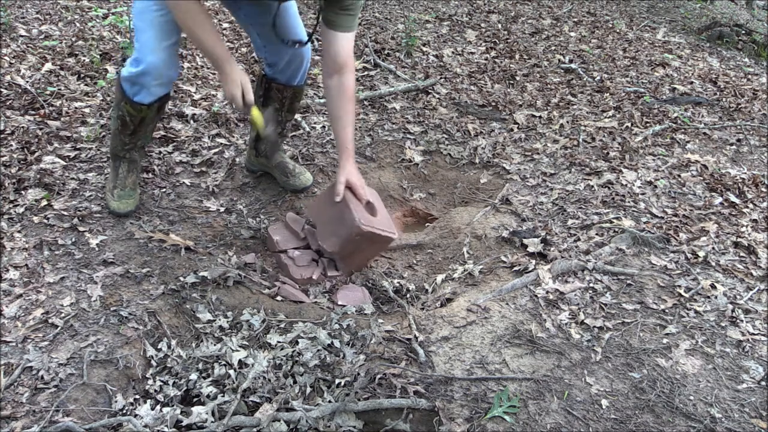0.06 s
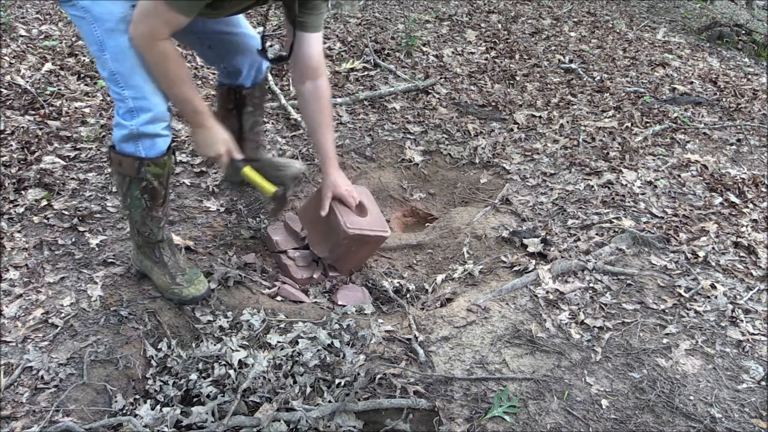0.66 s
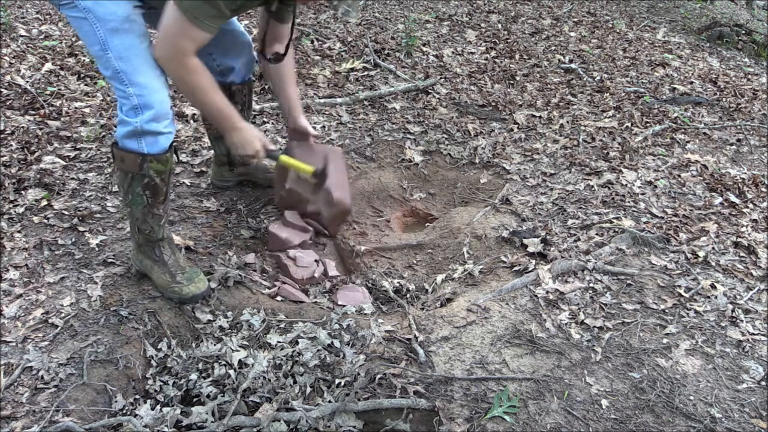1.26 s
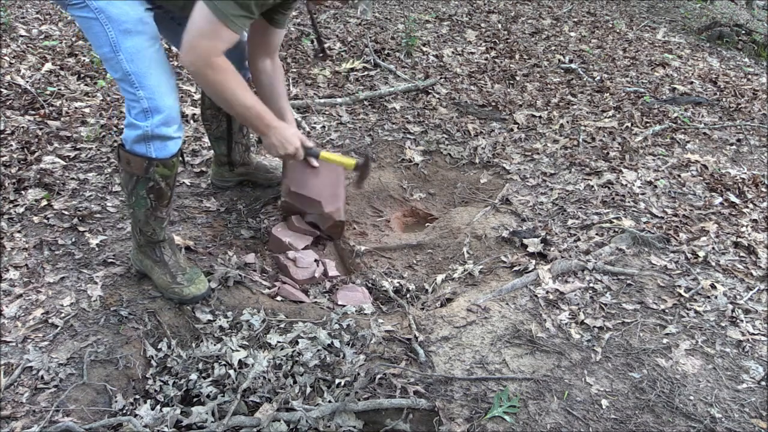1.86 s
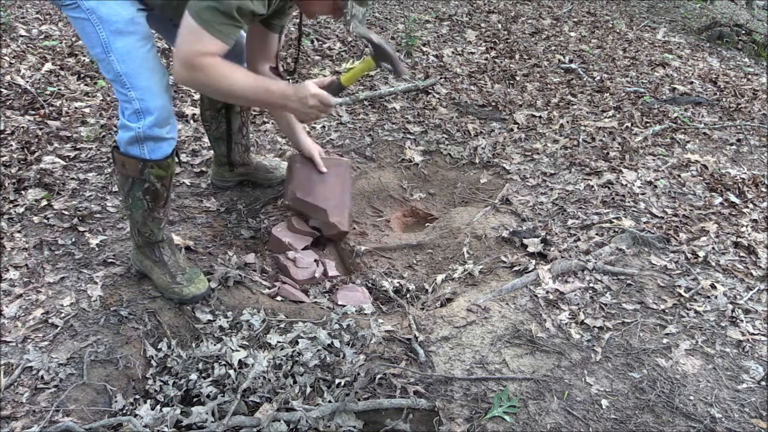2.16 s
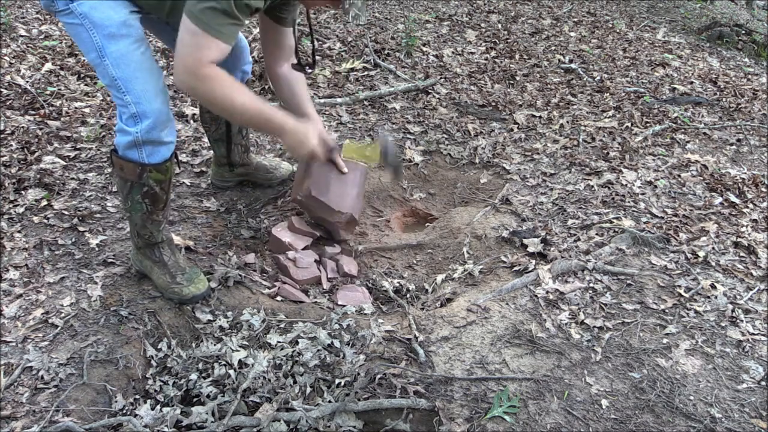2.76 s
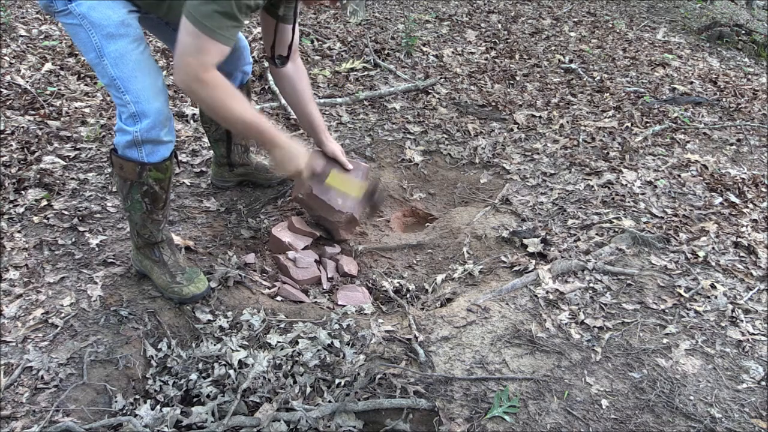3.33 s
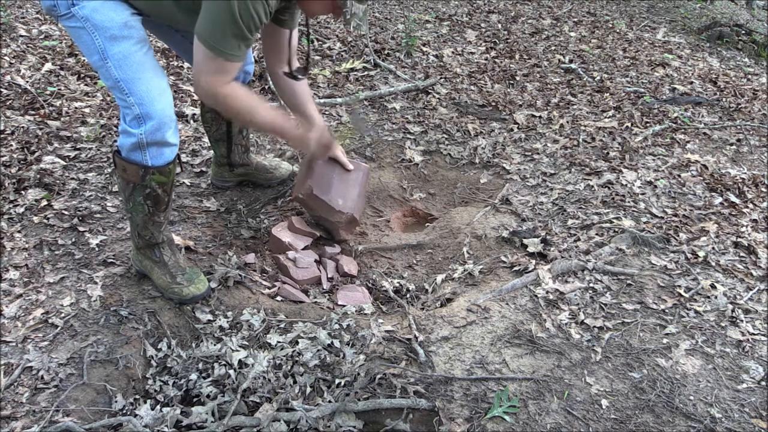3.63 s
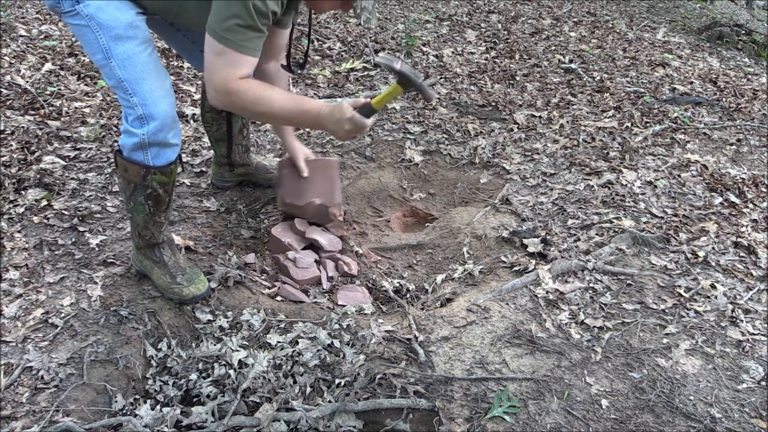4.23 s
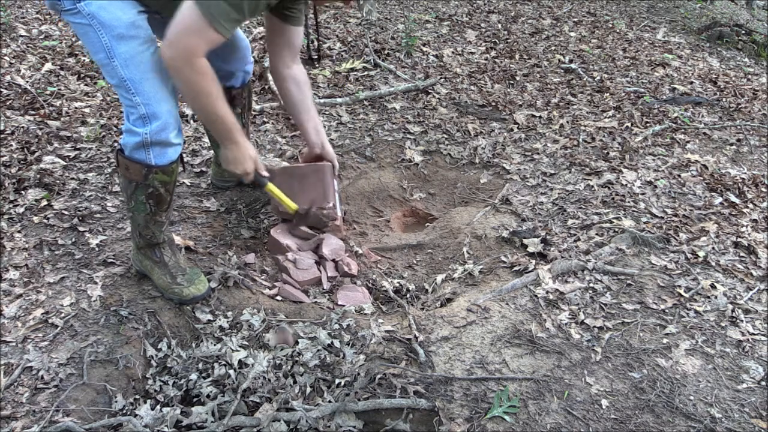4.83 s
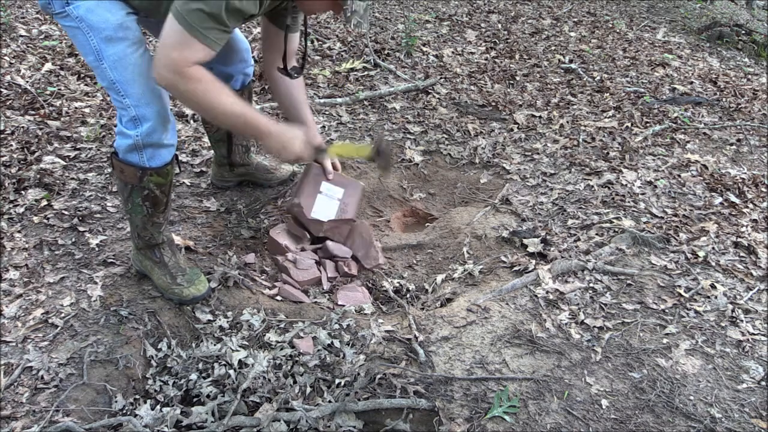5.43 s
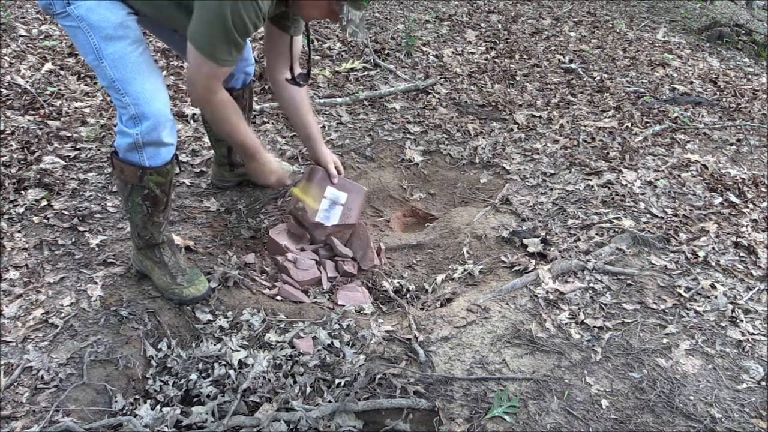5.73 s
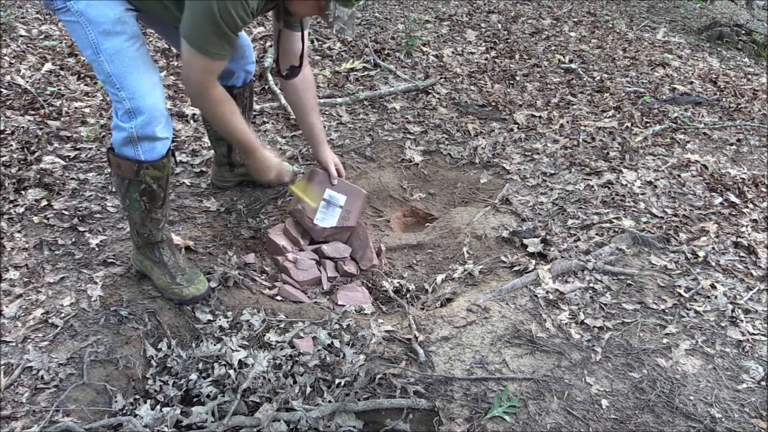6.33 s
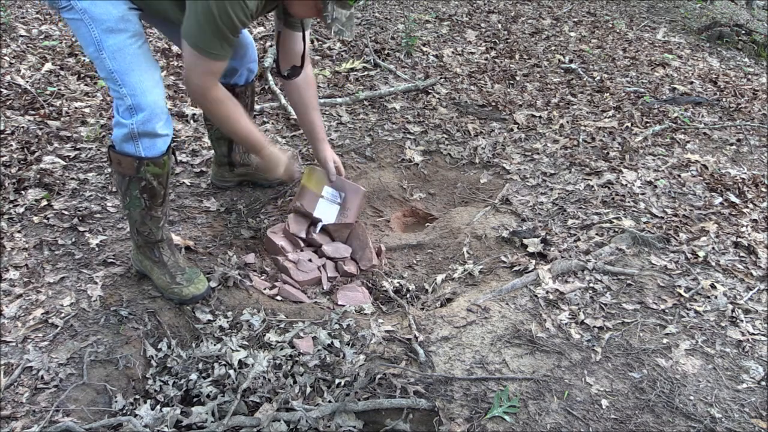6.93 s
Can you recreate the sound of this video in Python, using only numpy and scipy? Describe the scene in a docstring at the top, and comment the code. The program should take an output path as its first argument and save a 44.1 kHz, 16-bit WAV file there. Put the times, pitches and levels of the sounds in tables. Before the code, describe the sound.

Boots shuffle in dry leaves, then sharp hammer blows crack a stony block apart, scattering crumbs and knocking chunks onto a pile.

```python
"""A steel hammer breaks up a mineral block on a leafy forest floor, a step or two away.
First boots shuffle in dry leaves and stone knocks and grinds on stone. From 2.4 s four blows excite the
modes of block and hammer head; the trees scatter the sound back, crumbs fall and chunks clack on the pile.
Around 5 s the block is turned, and from 5.7 s three more blows follow.
Each blow overloads the recorder, whose limiter ducks and recovers."""
import sys
import numpy as np
from scipy import signal
from scipy.fft import rfft, irfft, next_fast_len
from scipy.io import wavfile
from scipy.ndimage import uniform_filter1d, minimum_filter1d

SR = 44100
rng = np.random.default_rng(int(sys.argv[2]) if len(sys.argv) > 2 else 0)


def persist_wave(psi):
    """Save psi, clipped to +-1, as 16-bit WAV."""
    counts = np.round(np.clip(psi, -1, 1) * 32767).astype(np.int16)
    wavfile.write(sys.argv[1], SR, np.atleast_2d(counts).T)


N = 317079
TIME = np.arange(N) / SR

# hammer blows: (time [s], level [dB], contact cutoff [Hz], block pitch [Hz], favoured resonance [Hz],
# hammer ring [dB], ring time [ratio], ground thump [dB], forest echo [dB], crumb shower [dB])
BLOWS = [(2.3776, 1.5, 1200, 694, 1260, -14.5, 0.63, -16, -19, -42),
         (3.0189, 2, 6900, 630, 2620, -5, 0.91, -1, -13.5, -63),
         (3.6384, 1.5, 5850, 626, 1870, -8.5, 0.84, -2, -17.5, -37.5),
         (4.3676, -2.5, 1140, 646, 1144, -11, .35, -3.5, -18.5, -37),
         (5.6832, 3.5, 2480, 672, 1450, -15.5, 1.1, -31, -20, -37),
         (6.2902, 3.5, 2800, 650, 1780, -8.5, 0.87, -10, -16.5, -37.5),
         (6.9056, 4, 7000, 629, 650, -9, 0.81, -5, -13, -39)]
# modes of the block at the pitch BLOCK_HZ: (frequency [Hz], level [dB], t60 [s])
BLOCK_MODES = [(276.5, -19, 0.029), (650, -4, 0.019), (800, -4, 0.012), (1061, -2, 0.013),
               (1355, -0.5, 0.0093), (1706, -7.5, 0.016), (2054, -3, 0.0093), (2963, -0.5, 0.01),
               (3765, -12.5, 0.027), (4490, 0, 0.015), (6910, 1, 0.009), (8000, -31, .012)]
BLOCK_HZ = 650


def from_db(db):
    """Decibels to amplitude ratio."""
    return 10 ** (np.asarray(db) / 20)


def rms_one(x):
    """Normalise to unit rms."""
    return x / np.sqrt(np.mean(x ** 2) + 1e-20)


def unit_hit(x):
    """Normalise to the energy of 5 ms at unit rms."""
    return x / np.sqrt(np.sum(x ** 2) / (.005 * SR))


def at_hz(points, hz):
    """Interpolate on a log-frequency axis."""
    known_hz, values = np.transpose(points)
    return np.interp(np.log(np.maximum(hz, 1)), np.log(known_hz), values)


def coloured(x, spectrum):
    """Zero-phase filtering by a curve of (frequency [Hz], gain [dB])."""
    size = next_fast_len(x.shape[-1] + 512)
    gain = from_db(at_hz(spectrum, np.fft.rfftfreq(size, 1 / SR)))
    return irfft(rfft(x, size) * gain, size)[..., :x.shape[-1]]


def low_pass(x, hz, order=1):
    """Causal Butterworth low-pass."""
    return signal.sosfilt(signal.butter(order, min(hz, .45 * SR), fs=SR, output="sos"), x)


def band_pass(x, hz, octaves):
    """A broad resonance reaching so many octaves to either side."""
    edges = np.minimum(hz * 2 ** (octaves * np.array([-1, 1])), [.4 * SR, .45 * SR])
    return signal.sosfilt(signal.butter(1, edges, "band", fs=SR, output="sos"), x + 1e-18)


def fade(t, t60):
    """Exponential decay, 60 dB in t60 seconds."""
    return np.exp(-np.log(1000) * t / t60)


def since(onset):
    """Seconds since an onset, zero before it."""
    return np.maximum(TIME - onset, 0)


def add(track, onset, sound):
    """Superpose a sound on a track."""
    start = round(onset * SR)
    track[..., start:start + sound.shape[-1]] += sound[..., :N - start]


def pair(draws, correlation):
    """Partial coherence: sum and difference of two independent signals give left and right."""
    mid = np.sqrt((1 + correlation) / 2) * draws[0]
    side = np.sqrt((1 - correlation) / 2) * draws[1]
    return np.array([mid + side, mid - side])


def balanced(x, balance):
    """Split a level difference equally between left and right."""
    left = coloured(x[0], [(hz, db / 2) for hz, db in balance])
    right = coloured(x[1], [(hz, -db / 2) for hz, db in balance])
    return np.array([left, right])


def still_air(level_db=-55.5):
    """Ambient noise of the woods: low-pitched, nearly incoherent, louder on the left."""
    # background spectrum: (frequency [Hz], level [dB])
    spectrum = [(15, -30), (25, -15.5), (80, -7.5), (117, -7.5), (149, -6.5), (212, -5.5), (293, -6),
                (531, -9), (677, -8.5), (1370, -15.5), (1560, -14), (16000, -29)]
    # its imbalance: (frequency [Hz], left minus right [dB])
    balance = [(80, 15), (300, 12.5), (1400, 11), (6000, 8.5)]
    noise = pair(rng.standard_normal((2, N)), correlation=0.082)
    return balanced(from_db(level_db) * rms_one(coloured(noise, spectrum)), balance)


def forest(x, build_s=0.032, early_t60=0.19, late_db=-17):
    """Multiple scattering: near trunks return a swelling cloud of echoes, far ones a faint tail."""
    # decay of the late echoes: (frequency [Hz], t60 [s])
    decay_times = [(150, 0.16), (1000, 1), (4000, 0.98), (8000, 0.68), (15000, 1)]
    # spectrum of the scattered sound: (frequency [Hz], gain [dB])
    colour = [(60, -34), (250, -9), (650, -5.5), (1200, -5.5), (2000, -2.5), (3200, -4.5), (4500, -3.5),
              (6000, -7), (8000, -7.5), (10000, -14.5), (15000, -36)]
    t = TIME[:SR]
    echoes = pair(rng.standard_normal((2, SR)), correlation=0.49)
    hz, centres = np.fft.rfftfreq(SR, 1 / SR), np.geomspace(125, 16000, 8)
    spectrum, late = rfft(echoes), 0
    for centre, share in zip(centres, np.eye(len(centres))):
        band = irfft(spectrum * at_hz(np.column_stack([centres, share]), hz), SR)
        late = late + band * fade(t, at_hz(decay_times, centre))
    build_up = 1 - np.exp(-(t / build_s) ** 2)
    response = (echoes * fade(t, early_t60) + from_db(late_db) * late) * build_up
    response = coloured(rms_one(response) / np.sqrt(SR), colour)
    return signal.fftconvolve(x[None], response, axes=-1)[:, :N]


def grains(per_s, spread_db, hiss_db):
    """Shot noise: two streams of tiny fractures of uneven size over a smooth rub."""
    sizes = from_db(spread_db * np.minimum(rng.exponential(1, (2, N)), 4))
    signs = rng.choice([-1, 1], (2, N))
    clicks = rms_one(sizes * signs * (rng.random((2, N)) < per_s / SR))
    return clicks + from_db(hiss_db) * rng.standard_normal((2, N))


def crumbs(bands=6, octaves=0.39):
    """Impulse responses: crumbs and leaf veins tick, each in one of several resonances."""
    clicks = grains(per_s=220, spread_db=3, hiss_db=-60)
    band_of_click = rng.integers(0, bands, N)
    ticks = 0
    for k, hz in enumerate(np.geomspace(2300, 10000, bands)):
        own_clicks = clicks * (band_of_click == k)
        ticks = ticks + band_pass(band_pass(own_clicks, hz, octaves), hz, octaves) / hz
    return rms_one(ticks)


def crumb_showers(flight_s=0.023, settle_s=0.11):
    """Envelope of thrown crumbs: a linear rise in flight, an exponential decay as they settle."""
    envelope = 0
    for onset, *_, shower_db in BLOWS:
        rise = np.minimum(since(onset) / flight_s, 1)
        envelope = envelope + from_db(shower_db) * rise * np.exp(-since(onset + flight_s) / settle_s)
    return envelope


def movement(stir_soil_db=-3.5, crumb_soil_db=-5):
    """Incoherent sources add in power: stirring, showers and steps give envelopes for soil and leaves."""
    # stirring of leaves and pile between moves: (time [s], level [dB])
    stirring = [(0, -57), (.9, -57), (1.5, -58.5), (2.2, -68), (3.5, -63), (3.85, -56), (4.7, -53),
                (5.15, -52), (5.55, -66), (7.19, -60.5)]
    # a boot steps or the block is turned: (peak time [s], half length [s], scuff [dB], crackle [dB])
    shuffles = [(0.195, 0.062, -51.5, -49.5), (0.35, 0.086, -54.5, -55.5), (0.617, 0.059, -44, -42.5),
                (1.151, 0.032, -45, -46), (1.316, 0.052, -52.5, -51), (1.714, 0.098, -51.5, -52),
                (4.725, 0.019, -65, -39), (5.18, 0.1, -56.5, -47.5), (5.416, 0.053, -51.5, -54),
                (6.586, 0.031, -51, -44)]
    stir = from_db(np.interp(TIME, *np.transpose(stirring))) * from_db([[stir_soil_db], [0]])
    showers = crumb_showers() * from_db([[crumb_soil_db], [0]])
    power = stir ** 2 + showers ** 2
    for peak_s, half_s, scuff_db, leaf_db in shuffles:
        swell = np.exp(-np.minimum(((TIME - peak_s) / half_s) ** 2, 20))
        power = power + (swell * from_db([[scuff_db], [leaf_db]])) ** 2
    return np.sqrt(power)


def shuffling(on_soil, on_leaves, scuff_db=0.5, leaves_db=-3.0, crumbs_db=-4.0):
    """Friction and fracture: soles and block scuff the soil while dry leaves and crumbs crackle."""
    # scuffed soil: (frequency [Hz], level [dB])
    soil_spectrum = [(40, -5), (120, 8), (300, 7.5), (700, 8.5), (1400, 8), (2500, 1.5), (6000, -26)]
    # crushed leaves: (frequency [Hz], level [dB])
    leaf_spectrum = [(500, -25), (1500, -5.5), (3000, 11), (5000, 10), (8000, 5), (16000, -8)]
    soil_grains = pair(grains(per_s=700, spread_db=2.5, hiss_db=0.5), correlation=0.95)
    leaf_grains = pair(grains(per_s=1500, spread_db=3.5, hiss_db=0.5), correlation=0.49)
    scuff = from_db(scuff_db) * rms_one(coloured(soil_grains, soil_spectrum))
    rustle = from_db(leaves_db) * rms_one(coloured(leaf_grains, leaf_spectrum))
    ticks = from_db(crumbs_db) * pair(crumbs(), correlation=0.83)
    return on_soil * scuff + on_leaves * (rustle + ticks)


def grinding(octaves=0.28, attack_s=0.007):
    """Stick-slip friction of stone on stone drives one resonance until the block is at rest."""
    # stone set down on stone: (time [s], level [dB], t60 [s], pitch [Hz])
    grinds = [(.333, -29, 0.093, 580), (1.65, -44.5, 0.8, 925), (1.99, -50, 0.43, 980),
              (4.159, -49, 1.3, 840), (4.94, -48, 1.6, 765)]
    slips = grains(per_s=290, spread_db=2.5, hiss_db=-19.5)[0]
    out = np.zeros(N)
    for onset, level_db, t60, hz in grinds:
        envelope = np.minimum(since(onset) / attack_s, 1) * fade(since(onset), t60)
        resonance = rms_one(band_pass(band_pass(slips, hz, octaves), hz, octaves))
        out += from_db(level_db) * envelope * resonance
    return out


def crack(t, t60):
    """Acoustic emission: grains crushed at a contact give a brief burst of noise."""
    # crushed grains: (frequency [Hz], level [dB])
    spectrum = [(100, -60), (600, 2), (1500, 3.5), (4500, -0.5), (7500, -1.5), (10000, -4), (16000, -22)]
    return unit_hit(coloured(rng.standard_normal(len(t)), spectrum) * fade(t, t60))


def snaps(t60=0.015, octaves=0.48):
    """Brittle fracture: small things break with a tick in one broad resonance."""
    # chips, twigs and leaves snapping: (time [s], level [dB], pitch [Hz])
    fractures = [(.070, -44, 3400), (0.201, -37, 4770), (.213, -39, 4430), (.273, -43.5, 3000),
                 (1.180, -38, 3280), (3.679, -22, 3440), (3.7583, -29, 5360), (3.9524, -36.5, 2340),
                 (4.383, -21, 6100), (4.393, -28.5, 4000), (4.4444, -29.5, 3900), (5.148, -40, 4000),
                 (5.768, -36.5, 7000)]
    out, t = np.zeros(N), TIME[:SR // 20]
    for onset, level_db, hz in fractures:
        add(out, onset, from_db(level_db) * unit_hit(band_pass(crack(t, t60), hz, octaves)))
    return out


def ring(modes, t, stretch):
    """Modal superposition: damped sines whose strengths vary a little from hit to hit."""
    scatter_db = rng.normal(0, 1.5, len(modes))
    return sum(from_db(db + scatter_db[k]) * np.sin(2 * np.pi * hz * stretch * t)
               * fade(t, t60) * (-1) ** k for k, (hz, db, t60) in enumerate(modes))


def small_knocks(on_soil, per_s=14, slot_s=.02, above_soil_db=4, spread_db=3, pitch_hz=740):
    """A random point process of clacks that follow the soil's level: (time [s], level [dB], pitch [Hz])."""
    slots = np.arange(0, TIME[-1] - slot_s, slot_s)
    chance, jitter = rng.random((2, len(slots)))
    strength, detune = rng.standard_normal((2, len(slots)))
    times = slots + slot_s * jitter
    levels_db = 20 * np.log10(np.interp(times, TIME, on_soil)) + above_soil_db + spread_db * strength
    pitches = pitch_hz * 2 ** (0.18 * detune)
    return np.column_stack([times, levels_db, pitches])[chance < per_s * slot_s]


def chunk_knocks(on_soil, grit_db=-8, grit_t60=0.099, lowest_mode_db=5, treble_ratio=1.27, bass_ratio=0.32):
    """Geometric scaling: chunks ring like copies of the block, smaller ones higher and more sharply."""
    # chunks and block knocking together: (time [s], level [dB], pitch [Hz])
    knocks = [(.146, -39.5, 747), (.3385, -36, 596), (1.147, -39.5, 386), (1.377, -43, 560),
              (1.410, -44, 710), (1.639, -29, 980), (1.686, -42, 870), (1.989, -40, 914), (2.399, -25, 910),
              (2.420, -28, 700), (2.4428, -24.5, 566), (2.4525, -26, 617), (2.531, -38.5, 860),
              (3.7402, -19, 700), (3.795, -37, 714), (3.906, -38, 734), (4.153, -35, 780),
              (4.381, -24, 1130), (4.4175, -32, 800), (4.4431, -27.5, 1120), (5.234, -38.5, 776),
              (5.408, -43, 564), (5.434, -42.5, 744), (5.784, -32.5, 700), (6.528, -37, 740),
              (6.652, -40, 740)]
    out, t = np.zeros(N), TIME[:SR // 10]
    for onset, level_db, pitch_hz in [*knocks, *small_knocks(on_soil)]:
        stretch = pitch_hz / BLOCK_HZ
        lowest_mode = from_db(lowest_mode_db) * ring(BLOCK_MODES[1:2], t, stretch)
        body = unit_hit(lowest_mode - ring(BLOCK_MODES[2:], t, stretch))
        knock = low_pass(body + from_db(grit_db) * crack(t, grit_t60), treble_ratio * pitch_hz)
        # a chunk radiates little below its lowest mode
        bass_cut = signal.butter(2, bass_ratio * pitch_hz, "high", fs=SR, output="sos")
        add(out, onset, from_db(level_db) * unit_hit(signal.sosfilt(bass_cut, knock)))
    return out


def steel_ring(t, ring_share):
    """Free vibration of the rebounding head; hand and motion modulate each mode's strength and phase."""
    # modes of the hammer head: (frequency [Hz], waver bandwidth [Hz], level [dB], t60 [s])
    head_modes = [(4260, 66, -38, 0.87), (5230, 110, -25, 0.48), (5235, 54, -40, 1.1),
                  (7000, 210, -40, 0.76)]
    out = 0
    for hz, width_hz, db, t60 in head_modes:
        in_phase, quadrature = rms_one(low_pass(rng.standard_normal((2, len(t))), width_hz, order=2))
        phase = 2 * np.pi * hz * t
        tone = in_phase * np.cos(phase) + quadrature * np.sin(phase)
        out = out + from_db(db) * fade(t, t60 * ring_share) * tone
    return out


def hammer_blows(crack_db=-5, favour_db=5, steel_db=1, thump_hz=90, thump_left_db=-4):
    """Impact excitation: block, crushed grains, steel and soil sound together, then the trees answer."""
    out, t = np.zeros((2, N)), TIME[:2 * SR // 3]
    thump_pan = from_db([[thump_left_db], [0]])
    for (onset, level_db, contact_hz, pitch_hz, favoured_hz,
         ring_db, ring_share, thump_db, echo_db, _) in BLOWS:
        # the spot that is struck favours some of the block's modes
        modes = [(hz, db + favour_db * np.exp(-(np.log(hz / favoured_hz) / 0.16) ** 2), t60)
                 for hz, db, t60 in BLOCK_MODES]
        body = unit_hit(ring(modes, t, pitch_hz / BLOCK_HZ))
        # a block that gives way lengthens the contact and dulls the blow
        strike = low_pass(body + from_db(crack_db) * crack(t, t60=0.022), contact_hz)
        # the block is too small to radiate much bass
        strike = unit_hit(strike - low_pass(strike, hz=300))
        head = pair([steel_ring(t, ring_share), steel_ring(t, ring_share)], correlation=0.96)
        steel = from_db(ring_db + steel_db) * head
        thump = from_db(thump_db) * np.sin(2 * np.pi * thump_hz * t) * fade(t, t60=0.011) * thump_pan
        # summed over all directions the blow is close to a plain click
        click = unit_hit(low_pass(signal.unit_impulse(len(t)) + 1e-18, contact_hz))
        echo = from_db(echo_db) * forest(click)[:, :len(t)]
        add(out, onset, from_db(level_db) * (strike + steel + thump + echo))
    return out


def microphones(x, right_lag_s=4.5e-5):
    """Acoustic shadow and path difference: the left side is duller, the right a moment later."""
    # shading of the left port: (frequency [Hz], left minus right [dB])
    shadow = [(60, 2), (250, -2.5), (600, -4), (1600, -6.5), (5000, -7.5), (15000, -12)]
    return balanced([x[0], np.interp(TIME - right_lag_s, TIME, x[1])], shadow)


def limiter(x, ceiling_db=-7.0, release_db_per_s=330):
    """Look-ahead limiting: each channel is turned down just before a peak and recovers steadily."""
    over_db = np.maximum(20 * np.log10(np.abs(x) + 1e-9) - ceiling_db, 0)
    ramp = release_db_per_s * TIME
    gain_db = ramp - np.maximum.accumulate(over_db + ramp, axis=-1)
    smooth_db = uniform_filter1d(minimum_filter1d(gain_db, size=41), size=41)
    return x * from_db(smooth_db)


def scene(debris_echo_db=-18):
    """Superposition of still air, blows, footwork, debris and its echoes."""
    on_soil, on_leaves = movement()
    air = still_air()
    blows = hammer_blows()
    rustle = shuffling(on_soil, on_leaves)
    debris = snaps() + grinding() + chunk_knocks(on_soil)
    echoes = from_db(debris_echo_db) * forest(debris)
    return microphones(blows + debris + echoes + rustle) + air


def record(dry, overload=1.41, cutoff_hz=15500):
    """Saturation in the microphones rounds off the blows, the limiter ducks them, the top is cut."""
    limited = limiter(overload * np.tanh(dry / overload))
    return signal.sosfilt(signal.ellip(10, .1, 80, cutoff_hz, fs=SR, output="sos"), limited)


dry = scene()
out = record(dry)
persist_wave(out)
```